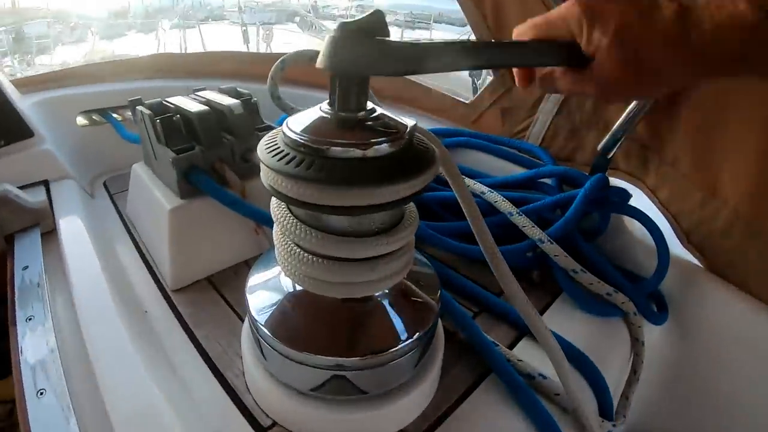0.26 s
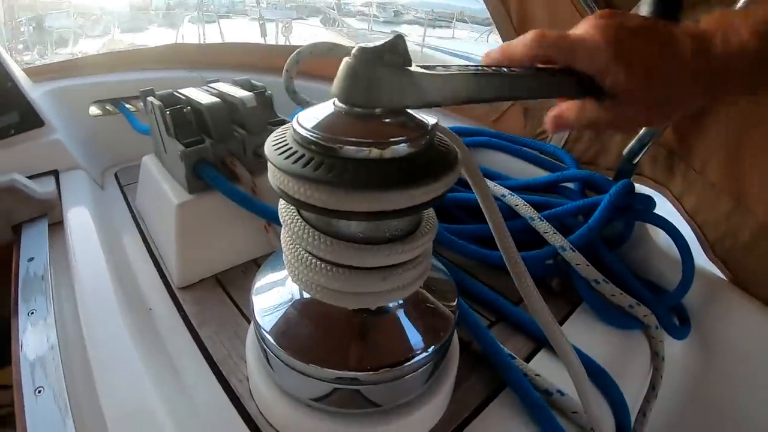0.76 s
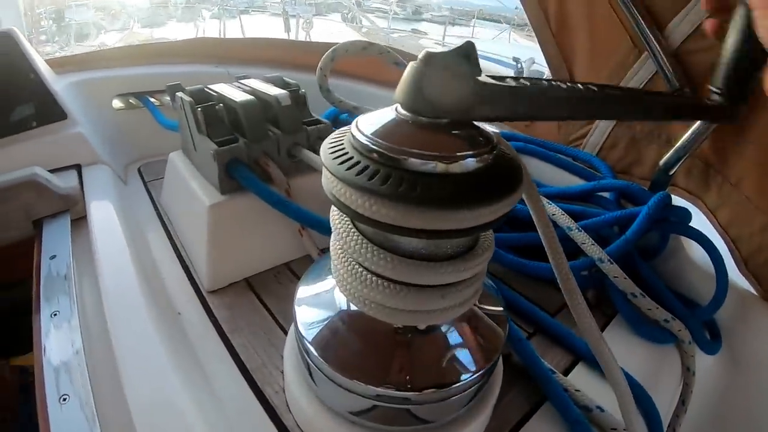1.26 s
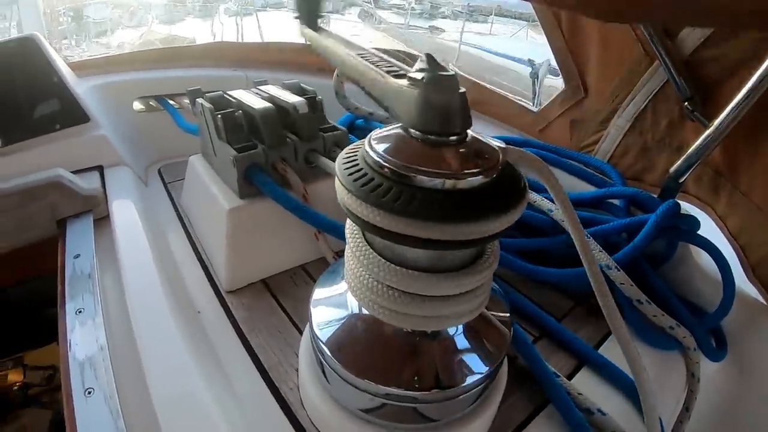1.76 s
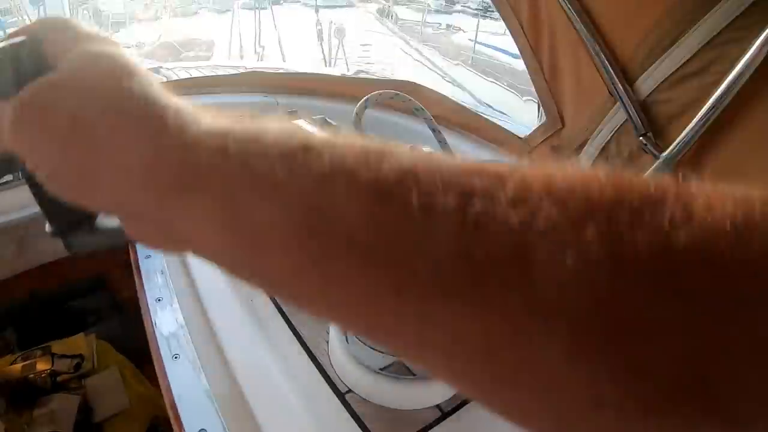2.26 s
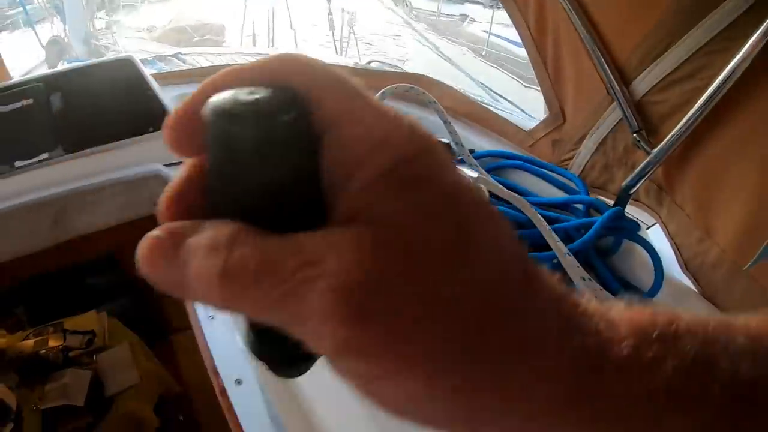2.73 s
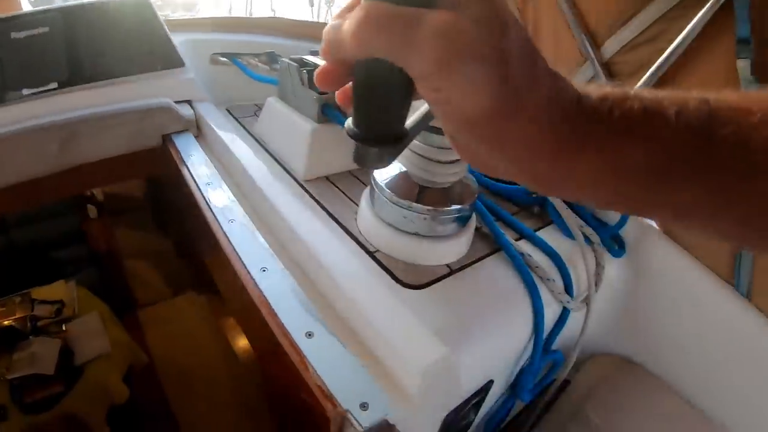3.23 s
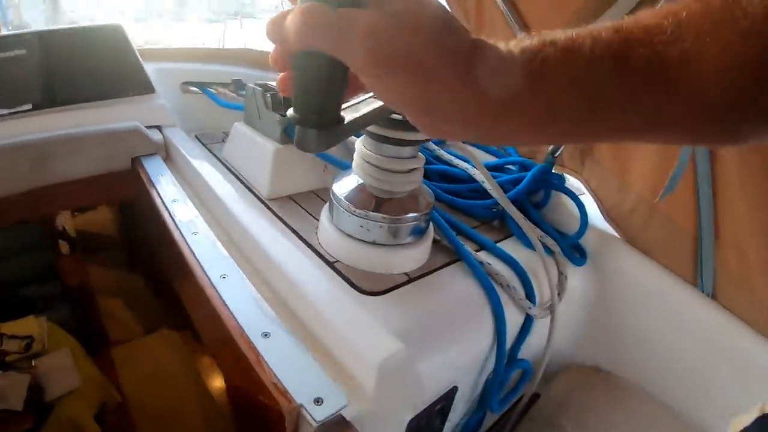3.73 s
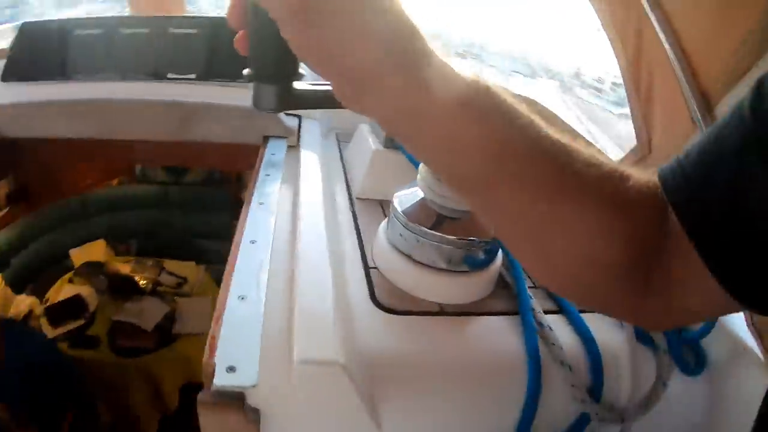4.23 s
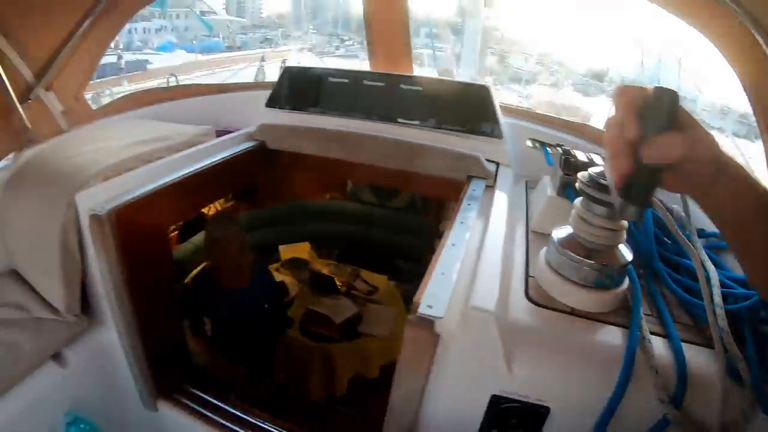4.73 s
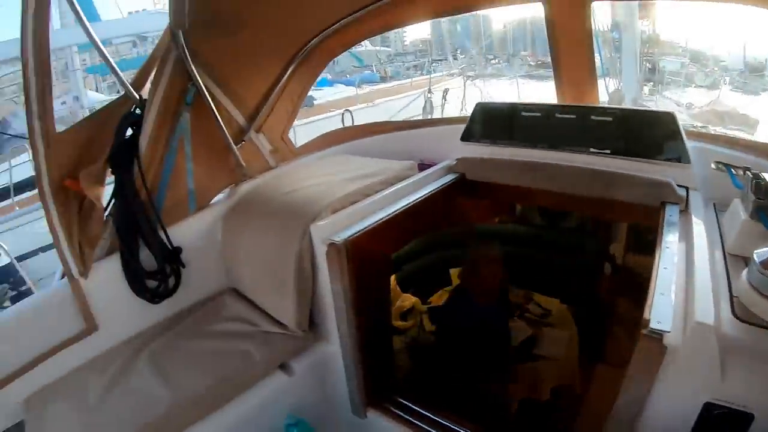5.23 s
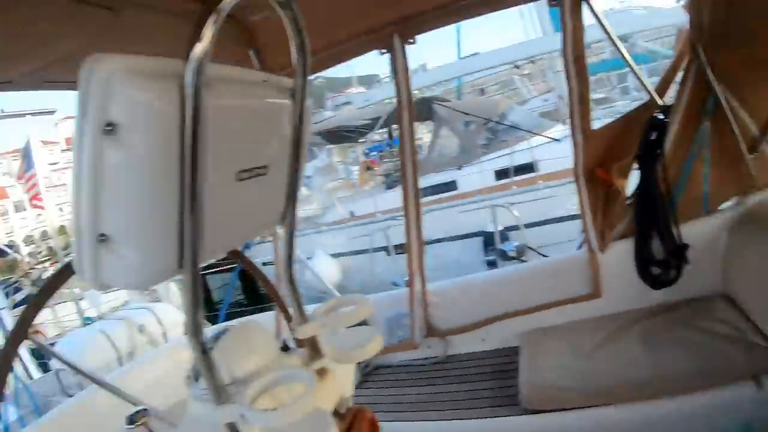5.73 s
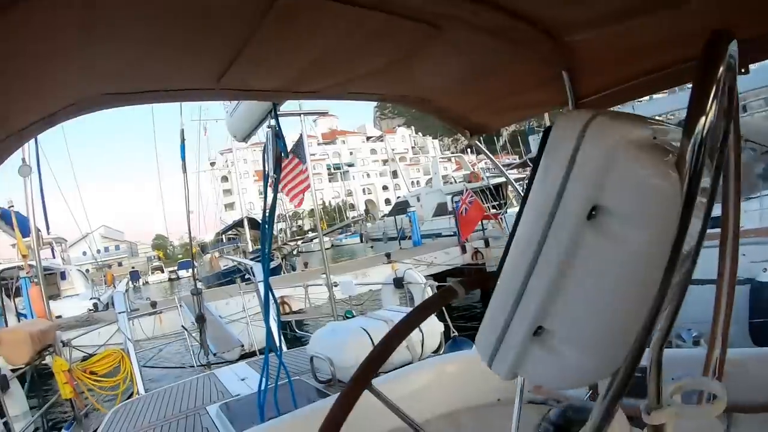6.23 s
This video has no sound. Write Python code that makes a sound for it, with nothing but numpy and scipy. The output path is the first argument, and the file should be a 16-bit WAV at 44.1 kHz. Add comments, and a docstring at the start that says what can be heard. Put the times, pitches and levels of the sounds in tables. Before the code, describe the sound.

In a boat cockpit in a marina, low rumble and a wavering machine hum stay faint throughout. At 0 s a steel handle knocks its winch socket, squeaks briefly around 0.06-0.1, hits strongly at 0.12, then bangs loudest at 0.47 with a bright short ring and deck thump. A small knock follows at 0.72. The lock snaps twice near 0.91; a faint bearing note glides and gears clunk dully at 1.28. From 1.37 to 2.6 pawls click close by, roughly every 0.07-0.1 s, some ringing high, slowing at the end. From 2.6 to 4.3 only grainy gear rub, soft clunks and sleeve swishes around 3.0-3.8 remain. Clicks return at 4.36, spaced 0.2 s, then quicken after 5 s to about thirteen per second, fainter and more echoing, continuing to the end near 6.4. The stereo microphone is close, with bass heavier on the right.

```python
"""A sailboat's steel sheet winch: pawls scrape, click and ring as noise bursts and decaying modes, over the
grainy noise of the gears. First the crank handle squeaks and knocks into its socket, its lock snaps, and the
gears take up with a clunk. The bearing sings in gliding tones and a sleeve swishes as shaped noise.
Behind, the marina is low noise, faint air and wavering hum. Heard close by, on two unequal microphones."""
import sys
import numpy as np
from scipy.fft import rfft, irfft, next_fast_len
from scipy.io import wavfile
from scipy.ndimage import map_coordinates

SR = 44100
rng = np.random.default_rng(int(sys.argv[2]) if len(sys.argv) > 2 else 0)


def inscribe(sig):
    """Save sig as 16-bit PCM at rate SR to the path in sys.argv[1].

    A 1-D sig is mono; a 2-D sig holds one channel per row.
    Samples are clipped to [-1, 1] before scaling.
    """
    pcm = np.round(np.clip(np.atleast_2d(sig).T, -1, 1) * 32767)
    wavfile.write(sys.argv[1], SR, pcm.astype(np.int16))


N = 285703
TIME = np.arange(N) / SR
AGE_S = np.arange(SR // 3) / SR  # time since a contact
BLOW = AGE_S < 1 / 40  # the first moments of a ring
TOP_HZ = 16000

# Levels in the tables are relative: the functions add trims.
# Likeness of left and right. Each row: frequency in Hz, correlation.
LIKENESS = [(25, 0.15), (120, 0.9), (1200, .8), (2500, 0.35), (4400, -.4), (8000, 0.11), (15000, 0.014)]

# Harbour air spectrum. Each row: frequency in Hz, level in dB.
AIR_COLOUR = [(12, -36), (20, -5.5), (32, -6.5), (116, -1.5), (248, -29.5), (293, -5), (328, -33),
              (738, -40), (802, -22.5), (1660, -50.5), (2080, -28.5), (2320, -46), (3340, -43.5),
              (4670, -58.5), (16000, -60.5)]
# Harbour rumble spectrum. Each row: frequency in Hz, level in dB.
RUMBLE_COLOUR = [(20, 2.5), (45, 0.0), (100, -4.5), (150, -12.5), (320, -22), (700, -32.0), (3000, -86.5)]
RUMBLE_DB, RUMBLE_SWAY_DB = -45, 0.9
# Low swells: short handling bumps, then a long slow swell.
# Each row: start in seconds, length in seconds, level in dB.
LOW_SWELLS = [(.465, .07, -35), (0.735, 0.093, -39), (5.15, 0.93, -51)]
# Distant machinery's steady notes. Each row: frequency in Hz, level in dB.
HUM_NOTES = [(49, -51), (75.5, -52), (294, -69)]
# Machinery's strongest note. Each row: time in seconds, level in dB.
DRONE_LEVEL = [(0.0, -59), (0.03, -48.5), (1.46, -49), (1.91, -48.5), (3.57, -67), (4.49, -53.5),
               (6.48, -52)]
DRONE_HZ = 111.9

# Swells of gear noise: the handle rattling into its seat, then pushes on the crank.
# Each row: start in seconds, length in seconds, level in dB.
GEAR_SWELLS = [(-.12, 0.36, -47.5), (.1, 1, -59.5), (0.894, 1, -54.5), (1.55, 0.97, -57), (2.449, 0.6, -56),
               (3.546, 1, -52.5), (4.64, 0.76, -58), (5.255, 1, -59), (6.038, 0.58, -58.5)]
IDLE_DB = -62  # gear noise between swells
# Gear rub spectrum. Each row: frequency in Hz, level in dB.
WHIRR_COLOUR = [(120, -33.5), (200, -5.5), (299, -5.5), (366, -4.5), (465, -4.5), (647, -11.5), (1270, -13),
                (1710, -14.5), (2210, -16.5), (4270, -20.5), (7680, -27.5), (16000, -39)]
# Drum resonances. Each row: centre in Hz, width in Hz, lift in dB.
DRUM_BODY = [(600, 170, 3), (1026, 50, -1.5), (1200, 60, 1.5), (1443, 13, -0.5), (1603, 17, 1),
             (1927, 70, 2), (2153, 54, 1), (2400, 84, -1), (2680, 33, 0.5), (3500, 32, -2.5)]

# Handle hits its socket. Each row: time in seconds, level in dB.
KNOCKS = [(0.0004, -19), (0.0248, -29.5), (0.0852, -24.5), (0.1173, -8.5), (0.1366, -24.5), (0.23, -30.5),
          (0.317, -52), (0.452, -34.5), (0.4734, 6), (0.636, -48), (0.7155, -32), (0.804, -44)]
# Knock spectrum. Each row: frequency in Hz, level in dB.
KNOCK_COLOUR = [(100, -26), (200, -9.5), (370, -21), (600, -16), (1200, -20.5), (1700, -18), (2400, 3.5),
                (2840, -9.5), (3600, -6), (4800, -15), (5400, -12), (6100, -18), (7800, -19.5),
                (10000, -31), (16000, -42)]
# Handle modes. Each row: frequency in Hz, level in dB, t60 in seconds.
HANDLE_MODES = [(1246, -10, 0.11), (2240, -7, 0.1), (2300, -7, 0.11), (2490, -3.5, 0.099),
                (2480, -5, 0.097), (2580, -8, 0.13), (2943, -13.5, 0.17), (3240, -14.5, .12),
                (3500, -8.5, 0.13), (3900, -12.5, 0.17), (3970, -10.5, 0.13), (5280, -12.5, 0.15),
                (5300, -13.5, 0.1), (6800, -22.5, 0.15), (7400, -18, 0.063)]
# Deck modes. Each row: frequency in Hz, level in dB, t60 in seconds.
DECK_MODES = [(153, -5, 0.11), (177, -2.5, 0.14), (197.3, 0, 0.13), (230, -10.5, 0.033),
              (310.2, -4.5, 0.12), (561, -9.5, 0.12), (815, -20.5, .1)]
DECK_DB, DECK_DB_PER_KNOCK_DB = -27.5, 0.77  # deck level under a 0 dB knock; growth with the knock
KNOCK_ECHO_DB, KNOCK_PAN_DB = -13, -0.5  # cockpit echo re direct; left re centre
# Handle binds in its socket and squeaks. Each row: time in seconds, level in dB.
SQUEAK_LEVEL = [(.055, -67), (.061, -31), (.072, -39), (.086, -32), (.096, -39), (.11, -73)]
# Squeak spectrum. Each row: frequency in Hz, level in dB.
SQUEAK_COLOUR = [(300, -21.5), (1700, -14.5), (2150, 0), (2290, 1.5), (2440, -1), (2600, -24), (5000, -34),
                 (16000, -50)]

# Gears take up slack. Each row: time in seconds, level in dB.
CLUNKS = [(1.283, -19.5), (1.304, -40), (2.566, -38), (2.732, -39.5), (3.812, -33.5), (3.877, -38),
          (4.142, -38), (4.435, -40.5), (5.03, -45), (5.224, -37)]
# Clunk spectrum. Each row: frequency in Hz, level in dB.
CLUNK_COLOUR = [(88, -33), (150, 3), (394, -10), (522, -0.5), (1100, -9), (1220, -4.5), (1350, -13.5),
                (2040, -12), (2370, -18.5), (8000, -43), (10400, -72), (17600, -120)]
SCUFFS_PER_S, SCUFF_DB, SCUFF_SPREAD_DB = 12, 8.5, 1  # rate; level re gear noise; scatter

# Handle's lock catches. Each row: time in seconds, snap level in dB, ping level in dB.
LOCK_CATCHES = [(0.758, -57, -56), (0.8598, -48, -67), (0.9057, -19.5, -57), (0.924, -18.5, -32.5),
                (1.2508, -47, -56)]
# Lock modes. Each row: frequency in Hz, level in dB, t60 in seconds.
LOCK_MODES = [(4380, 7, 0.08), (4480, 1, 0.071), (6550, -5, 0.053), (10670, -8, 0.082), (11000, -15, 0.23)]
# Lock snap spectrum. Each row: frequency in Hz, level in dB.
LOCK_COLOUR = [(180, -43.5), (300, -12), (1230, -6.5), (2610, -11), (4440, -8), (5160, -7.5), (8500, -10),
               (9880, -17), (11100, -16), (16000, -24)]

# Bearing notes. Each row: start in seconds, length in seconds, first Hz, last Hz, level in dB.
BEARING_NOTES = [(1.035, 0.31, 1470, 1510, -58.5), (1.185, 0.23, 287, 180, -45),
                 (1.198, 0.092, 2580, 2960, -54), (1.284, 0.29, 2920, 3050, -58),
                 (1.494, .16, 1190, 1170, -56), (4.823, 0.1, 1580, 1620, -64),
                 (4.83, 0.084, 2410, 2500, -63)]

# Pawl drops off a tooth. Each row: time in seconds, clack level in dB, ring level in dB.
PAWL_DROPS = [(1.374, -29.5, -51), (1.472, -28, -31), (1.566, -26.5, -39), (1.646, -24, -29),
              (1.714, -23.5, -46), (1.778, -25, -59), (1.847, -24.5, -51), (1.923, -24.5, -39.5),
              (1.994, -26, -51), (2.072, -23, -45), (2.162, -23.5, -41), (2.299, -26.5, -27.5),
              (2.436, -26, -35), (2.591, -32, -42.5), (4.357, -31, -43), (4.557, -30.5, -60),
              (4.753, -29.5, -51.5), (4.935, -32, -53), (5.062, -30.5, -65), (5.134, -31.5, -50),
              (5.193, -30.5, -48), (5.267, -33, -40.5), (5.374, -30.5, -34.5), (5.453, -32, -34),
              (5.533, -31.5, -48), (5.623, -36, -55), (5.713, -37, -45), (5.79, -35, -38.5),
              (5.857, -34, -37.5), (5.918, -30.5, -63), (5.982, -36.5, -71), (6.059, -35.5, -41.5),
              (6.143, -36.5, -35), (6.215, -38, -34.5), (6.29, -33.5, -39), (6.367, -32.5, -50),
              (6.441, -32.5, -47)]
# Pawl modes. Each row: frequency in Hz, level in dB, t60 in seconds.
PAWL_MODES = [(4910, -8, 0.047), (5265, -2, 0.12), (5390, -1, 0.065), (5550, 1.5, 0.052),
              (5560, -24, 0.031), (5910, -15, 0.056)]
# Pawl overtones. Each row: frequency in Hz, level in dB, t60 in seconds.
PAWL_OVERTONES = [(12000, 13, 0.095), (11800, 1, 0.055), (12500, -11, 0.046), (12200, -9.5, .035)]
# Clack and scrape spectrum. Each row: frequency in Hz, level in dB.
CLACK_COLOUR = [(150, -25), (400, -5.5), (700, -6), (1200, -0.5), (2300, -1.5), (3200, -4), (4200, -7),
                (5500, -7), (8000, -31)]
# Pawl spring snap spectrum. Each row: frequency in Hz, level in dB.
SNAP_COLOUR = [(2500, -20.5), (4300, -1.5), (5200, 5.5), (6500, 3.5), (8000, -2.5), (10500, -5),
               (12000, -5), (13500, -7), (16000, -4)]
# Listening distance from the winch. Each row: time in seconds, distance in m.
DISTANCE = [(1.9, 0.25), (2.6, 0.48), (4.36, .75), (4.75, 0.78), (6.4, 1.02)]
NEAR_M = 0.35
SNAP_DB, ECHO_DB = -38, -10  # snap; cockpit echo re direct: both at NEAR_M
CLACK_DB, RING_DB, THUMP_DB = -9.5, -6, -25  # trims of clack, ring and deck thump
CHATTER_DB = 1.3  # unevenness within a click
OVERTONE_DB, OVERTONE_MOST_DB, OVERTONE_SPREAD_DB = -12.5, -43.5, 0.5  # re ring; ceiling; scatter
DETUNE = 0.0035  # scatter of pawl pitch, as a share

# Sleeve brushes past. Each row: start in seconds, length in seconds, level in dB.
SWISHES = [(3.005, .25, -49), (3.281, 0.094, -58), (3.539, 0.064, -59), (3.629, 0.091, -53),
           (3.752, 0.094, -56.5)]
# Cloth spectrum. Each row: frequency in Hz, level in dB.
SLEEVE_COLOUR = [(410, -41), (700, -3.5), (910, -13), (1210, -4), (4670, -8.5), (6650, -8), (14000, -23),
                 (16000, -26)]

# Draught spectrum. Each row: frequency in Hz, level in dB.
DRAUGHT_COLOUR = [(12, -7.5), (25, 0.5), (45, -5.5), (90, -19), (400, -59.5)]


def amp(db):
    """Decibels to gain."""
    return 10 ** (np.asarray(db) / 20)


def unit(x):
    """Scale to rms 1."""
    return x / np.sqrt(np.mean(x ** 2) + 1e-20)


def along(points, hz):
    """Read (Hz, value) points on a log axis."""
    f, v = np.transpose(points)
    return np.interp(np.log(hz + 1), np.log(f + 1), v)


def curve(rows, t_s=TIME):
    """Join (s, value) rows by straight lines."""
    return np.interp(t_s, *np.transpose(rows))


def wobble(knots_per_s, size=N):
    """Smooth random curve through random knots."""
    knots = rng.standard_normal(int(size * knots_per_s / SR) + 4)
    return map_coordinates(knots, [np.arange(size) * knots_per_s / SR])


def swell(start_s, length_s, steep):
    """Arch that rises from nothing and returns; steep narrows it."""
    share = (TIME - start_s) / length_s
    return np.abs(np.sin(np.pi * share)) ** steep * (share > 0) * (share < 1)


def add(track, start_s, sound):
    """Mix a sound in from start_s, cut at the track's end."""
    start = max(round(start_s * SR), 0)
    room = track[:, start:start + sound.shape[1]]
    room += sound[:, :room.shape[1]]


def noise(colour, size=N, body=()):
    """Coloured stereo noise of rms 1, lifted by a body's resonances."""
    m = next_fast_len(size)
    hz = np.fft.rfftfreq(m, 1 / SR)
    lift = sum(amp(db) / (1 + (2 * (hz - centre) / width) ** 2) for centre, width, db in body)
    gain = amp(along(colour, hz)) * (1 + lift)
    # mid and side shares set the left-right correlation
    turn = np.arccos(np.clip(along(LIKENESS, hz), -1, 1)) / 2
    spectra = rfft(rng.standard_normal((2, m))) * gain * [np.cos(turn), np.sin(turn)]
    mid, side = irfft(spectra, m)[:, :size]
    return unit(np.array([mid + side, mid - side]))


def contact(colour, rise_s, hold_s, t60_s, echo_db, echo_t60_s, body=()):
    """Parts chatter briefly, then the burst dies and leaves the cockpit's short echo."""
    after_s = np.maximum(AGE_S - hold_s, 0)
    direct = amp(-60 * after_s / t60_s)
    echo = amp(echo_db - 60 * after_s / echo_t60_s)
    attack = 1 - np.exp(-AGE_S / rise_s)
    return noise(colour, size=len(AGE_S), body=body) * np.hypot(direct, echo) * attack


def ring(modes, rise_s, blur):
    """Decaying modes at fresh strengths, rms 1 during the blow; reflections blur phase and level."""
    out = np.zeros((2, len(AGE_S)))
    for hz, db, t60_s in modes:
        apart = np.arccos(np.clip(along(LIKENESS, hz), -1, 1)) * rng.normal() / 2
        phase = 2 * np.pi * (hz * AGE_S + rng.random()) + np.array([[apart], [-apart]])
        scatter = np.array([wobble(200, len(AGE_S)) + 1j * wobble(200, len(AGE_S)) for ear in "LR"])
        level = amp(db + rng.normal(0, 2.5) - 60 * AGE_S / t60_s)
        out += level * np.real((1 + blur * scatter) * np.exp(1j * phase))
    out *= 1 - np.exp(-AGE_S / rise_s)
    return out / np.std(out[:, BLOW])


def marina():
    """Low harbour rumble with added low swells, wavering machinery hum and faint air."""
    level = amp(RUMBLE_DB + RUMBLE_SWAY_DB * wobble(2.1))
    level = level + sum(amp(db) * swell(s, length_s, steep=1.2) for s, length_s, db in LOW_SWELLS)
    rumble = level * noise(RUMBLE_COLOUR)
    air = amp(-52.5) * noise(AIR_COLOUR)
    hum = np.zeros(N)
    for hz, db in HUM_NOTES + [(DRONE_HZ, curve(DRONE_LEVEL))]:
        waver = amp(db + 1.5 + 2 * np.tanh(wobble(2.7)))
        hum += waver * np.sin(2 * np.pi * hz * TIME + 1.2 * wobble(4))
    return rumble + air + hum


def gear_gain():
    """Gain of the gear noise: swells add in power to the idle rub."""
    swells = sum((amp(db) * swell(s, length_s, steep=0.69)) ** 2 for s, length_s, db in GEAR_SWELLS)
    return np.sqrt(amp(IDLE_DB) ** 2 + swells)


def gears():
    """Gears rub in short uneven grains, coloured by the drum, over a smoother rub."""
    unevenness = amp(2.5 * np.tanh(wobble(45)) + 7 * np.tanh(wobble(260)))
    grains = unevenness * noise(WHIRR_COLOUR, body=DRUM_BODY)
    rub = amp(1.2 * wobble(25)) * noise(WHIRR_COLOUR)
    return gear_gain() * (amp(-3.5) * unit(grains) + amp(-2) * unit(rub))


def handle():
    """The handle squeaks and knocks into its socket; blows shake the deck."""
    squeaking = (TIME > SQUEAK_LEVEL[0][0]) * (TIME < SQUEAK_LEVEL[-1][0])
    out = amp(curve(SQUEAK_LEVEL)) * squeaking * noise(SQUEAK_COLOUR)
    for s, db in KNOCKS:
        crack = contact(KNOCK_COLOUR, rise_s=0.00041, hold_s=0.003, t60_s=0.017,
                        echo_db=KNOCK_ECHO_DB, echo_t60_s=0.14)
        steel = ring(HANDLE_MODES, rise_s=0.001, blur=0.3)
        add(out, s, amp(db - 9) * crack + amp(db - 32) * steel)
        thump = ring(DECK_MODES, rise_s=0.0034, blur=0.31)
        add(out, s + 0.0027, amp(DECK_DB + DECK_DB_PER_KNOCK_DB * db) * thump)
    return out * amp([[KNOCK_PAN_DB], [-KNOCK_PAN_DB]])


def take_up():
    """Greased teeth clunk dully as the load changes, and scuff at random, louder with the gear noise."""
    out = np.zeros((2, N))
    scuffs_s = rng.uniform(0, N / SR, round(SCUFFS_PER_S * N / SR))
    gear_db = 20 * np.log10(np.interp(scuffs_s, TIME, gear_gain()))
    scuffs_db = gear_db + SCUFF_DB + SCUFF_SPREAD_DB * rng.uniform(-1, 1, len(scuffs_s))
    for s, db in [*CLUNKS, *zip(scuffs_s, scuffs_db)]:
        clunk = contact(CLUNK_COLOUR, rise_s=0.0006, hold_s=0.01, t60_s=0.055,
                        echo_db=-2.5, echo_t60_s=0.15)
        add(out, s, amp(db - 12) * clunk)
    return out


def lock():
    """The sprung catch in the handle's head snaps and pings."""
    out = np.zeros((2, N))
    for s, db, ping_db in LOCK_CATCHES:
        snap = contact(LOCK_COLOUR, rise_s=0.00079, hold_s=0.0046, t60_s=0.034,
                       echo_db=-9, echo_t60_s=0.15)
        ping = ring(LOCK_MODES, rise_s=0.0012, blur=0.36)
        add(out, s, amp(db - 11.5) * snap + amp(ping_db - 4) * ping)
    return out


def bearing():
    """Friction draws faint, fuzzy, gliding notes from the drum's bearing."""
    out = np.zeros(N)
    for s, length_s, first_hz, last_hz, db in BEARING_NOTES:
        glide_hz = np.interp(TIME, [s, s + length_s], [first_hz, last_hz])
        pitch_hz = glide_hz + 150 * wobble(600)  # stick and slip scatter the pitch
        level = amp(db + 2.7 * wobble(150)) * swell(s, length_s, steep=0.9)
        out += level * np.sin(2 * np.pi * np.cumsum(pitch_hz) / SR)
    return out


def seated(modes):
    """A pawl's modes, slightly detuned by the way it lands."""
    return [(hz * (1 + DETUNE * rng.normal()), db, t60_s) for hz, db, t60_s in modes]


def ratchet():
    """Pawls scrape up a tooth, snap off, clack through drum and deck, and ring; duller and wetter afar."""
    out = np.zeros((2, N))
    for s, db, ring_db in PAWL_DROPS:
        far_db = 20 * np.log10(curve(DISTANCE, s) / NEAR_M)
        echo_db = ECHO_DB + far_db

        scrape = contact(CLACK_COLOUR, rise_s=0.0069, hold_s=0.005, t60_s=0.083,
                         echo_db=-16, echo_t60_s=0.1, body=DRUM_BODY)
        add(out, s - rng.uniform(0.013, 0.041), amp(db - 28.5 + rng.normal(0, 2.74)) * scrape)

        clack = contact(CLACK_COLOUR, rise_s=0.0014, hold_s=0.0056, t60_s=0.052,
                        echo_db=echo_db + 3.5, echo_t60_s=0.15, body=DRUM_BODY)
        snap = contact(SNAP_COLOUR, rise_s=0.0009, hold_s=0.0048, t60_s=0.024,
                       echo_db=echo_db, echo_t60_s=0.17)
        clack_gain = amp(db + CLACK_DB) / np.hypot(1, amp(echo_db))
        click = clack_gain * clack + amp(SNAP_DB - far_db) * snap
        click *= unit(amp(CHATTER_DB * wobble(503, size=len(AGE_S))))
        add(out, s - 0.001, click)
        add(out, s + rng.uniform(0.000974, 0.005), 0.5 * click)  # the pawl bounces once

        thump = ring(DECK_MODES, rise_s=0.0044, blur=0.58)
        add(out, s + 0.0021, amp(db + THUMP_DB) * thump)
        pawl = ring(seated(PAWL_MODES), rise_s=0.0021, blur=0.87)
        add(out, s, amp(ring_db + RING_DB) * pawl)
        overtone_db = min(ring_db + OVERTONE_DB, OVERTONE_MOST_DB) + rng.normal(0, OVERTONE_SPREAD_DB)
        overtone = ring(seated(PAWL_OVERTONES), rise_s=0.0009, blur=0.54)
        add(out, s, amp(overtone_db) * overtone)
    return out


def sleeve():
    """Cloth swishes as the arm swings past."""
    moving = sum(amp(db) * swell(s, length_s, steep=1.35) for s, length_s, db in SWISHES)
    return moving * amp(0.77 * wobble(70)) * noise(SLEEVE_COLOUR)


def scene():
    """Everything heard in the cockpit."""
    return marina() + gears() + handle() + take_up() + lock() + bearing() + ratchet() + sleeve()


def microphones(dry, corner_hz, left_db, bass_db, leak):
    """The left port loses the bass that the right one lifts."""
    m = next_fast_len(N + SR // 2)
    hz = np.fft.rfftfreq(m, 1 / SR)
    treble = 1j * hz / (corner_hz + 1j * hz)
    left = amp(left_db) * (treble + 1j * leak)
    right = treble + amp(bass_db) * (1 - treble)
    return irfft(rfft(dry, m) * [left, right], m)[:, :N]


def record(dry):
    """Unequal microphones, a draught on the left port, clipping at full scale, and a band limit."""
    x = microphones(dry, corner_hz=1100, left_db=2.5, bass_db=5.5, leak=0.053)
    draught = noise(DRAUGHT_COLOUR)[0]
    x[0] += amp(-49.5 + 2 * np.tanh(wobble(2.2))) * draught
    m = next_fast_len(N + SR // 2)
    hz = np.fft.rfftfreq(m, 1 / SR)
    band = np.clip((TOP_HZ - hz) / 500 + 0.5, 0, 1) ** 2
    return irfft(rfft(np.clip(x, -1, 1), m) * band, m)[:, :N]


dry = scene()
out = record(dry)
inscribe(out)
```